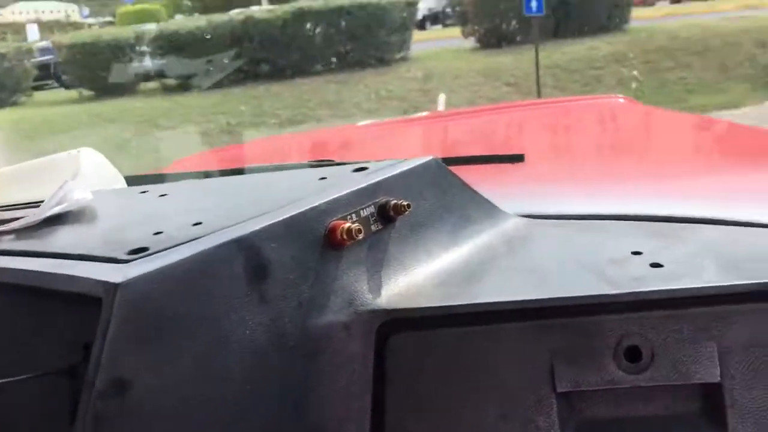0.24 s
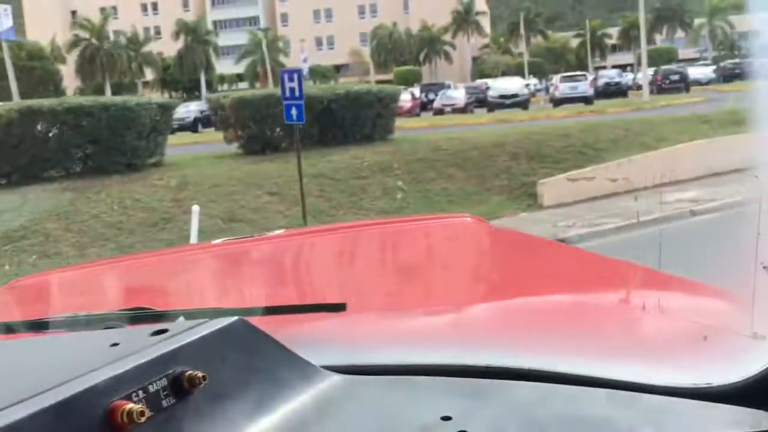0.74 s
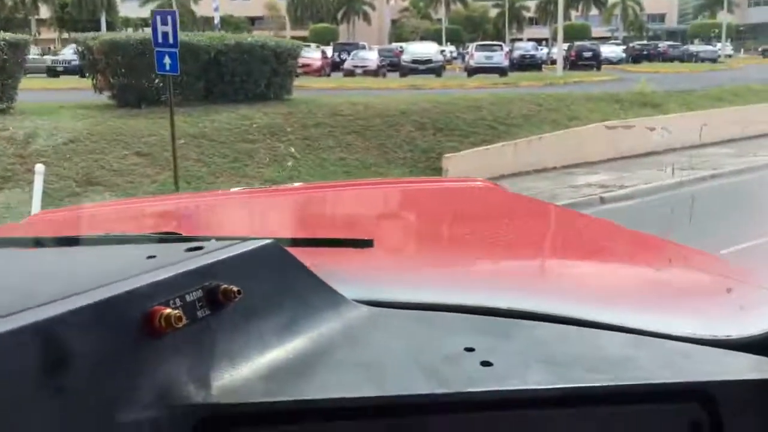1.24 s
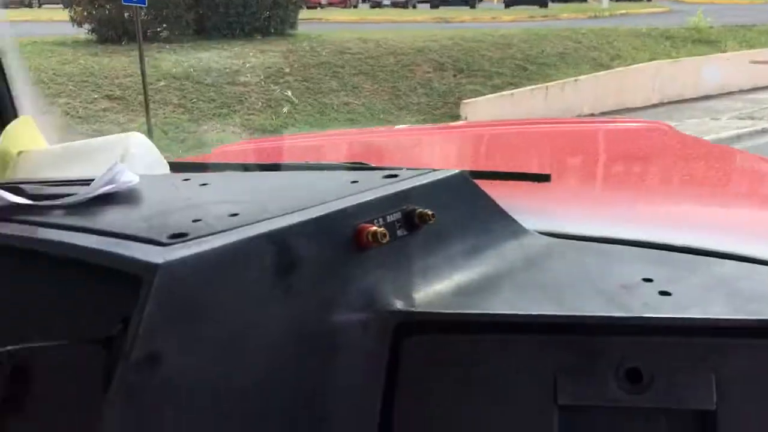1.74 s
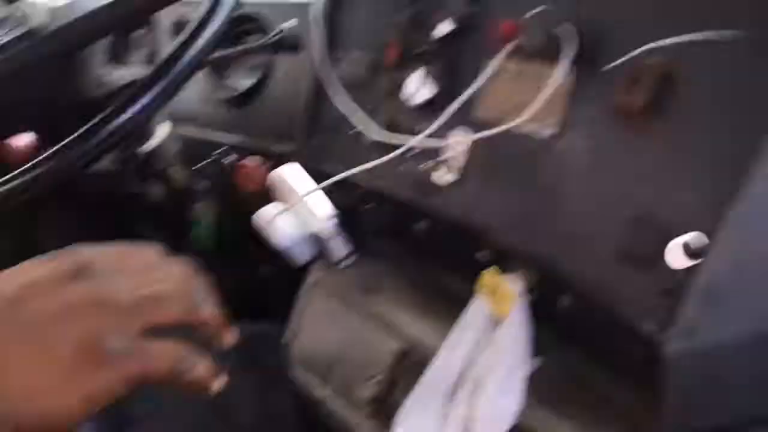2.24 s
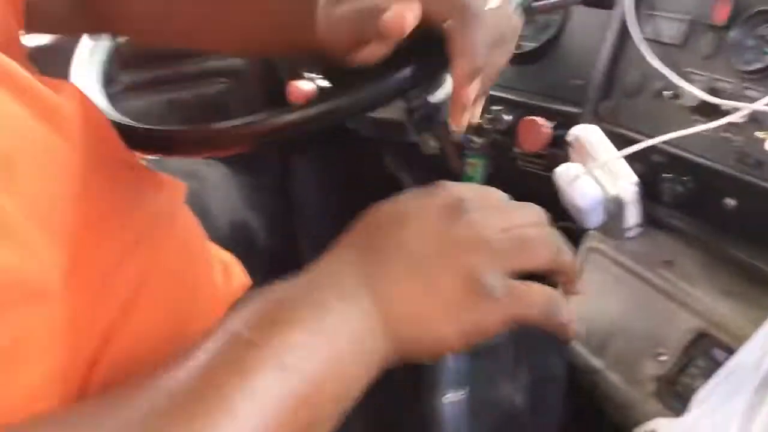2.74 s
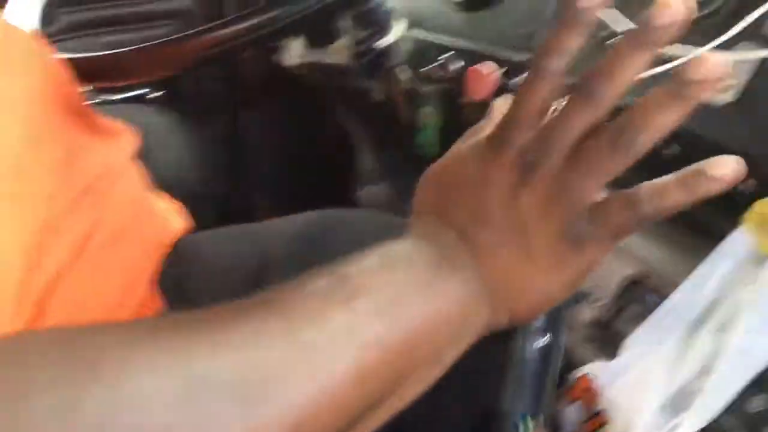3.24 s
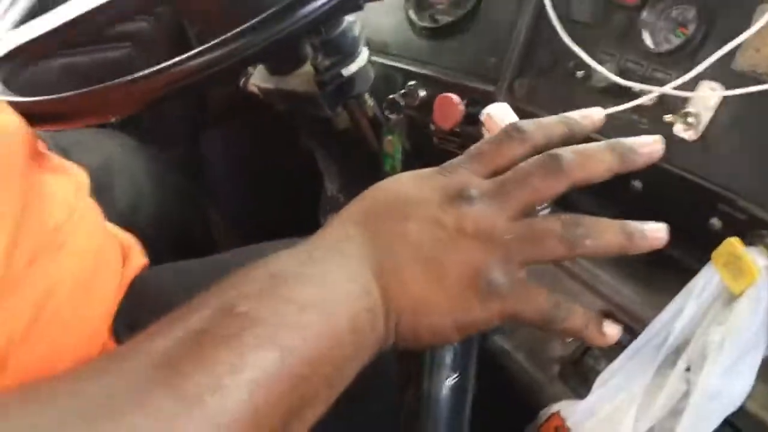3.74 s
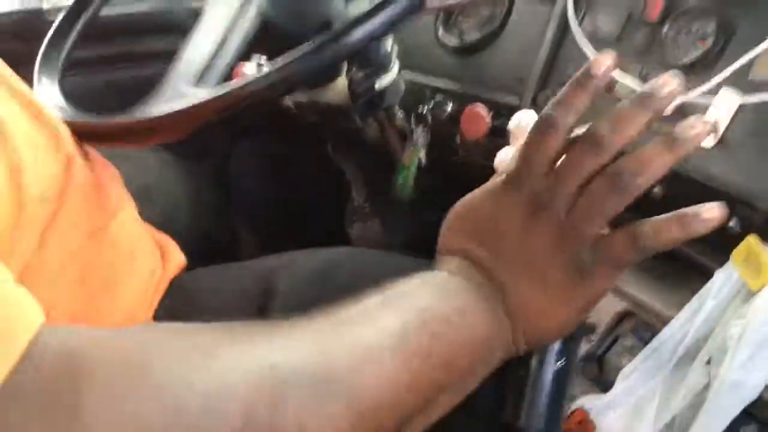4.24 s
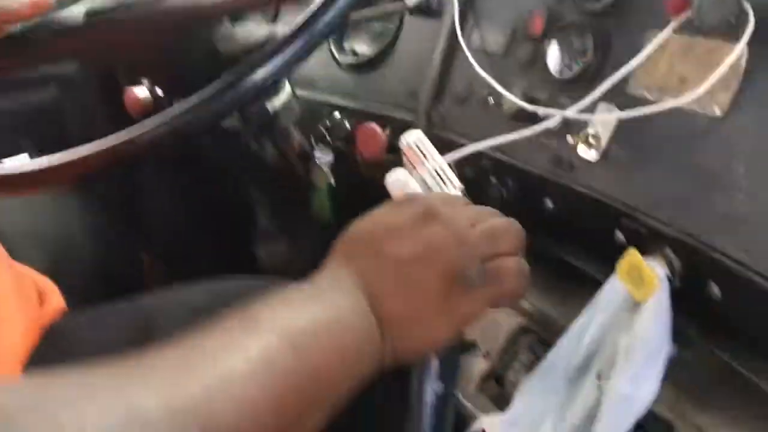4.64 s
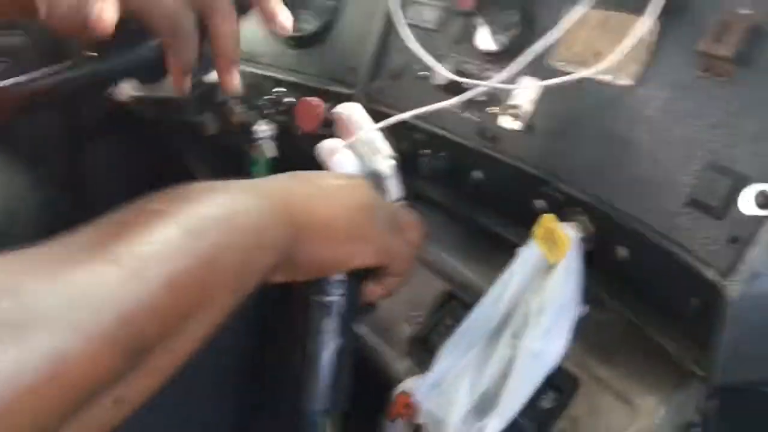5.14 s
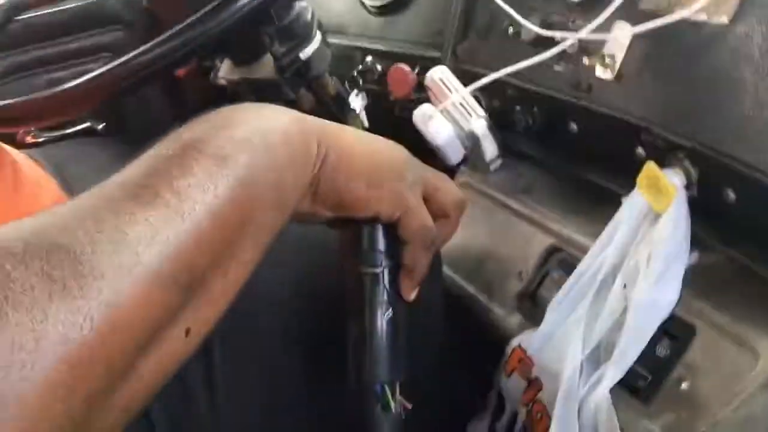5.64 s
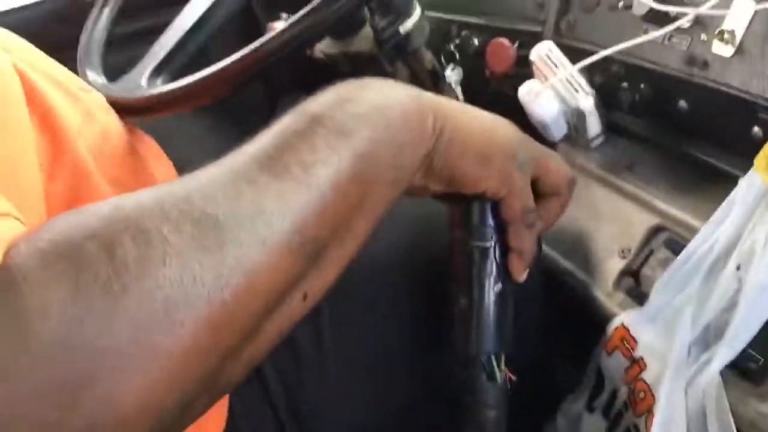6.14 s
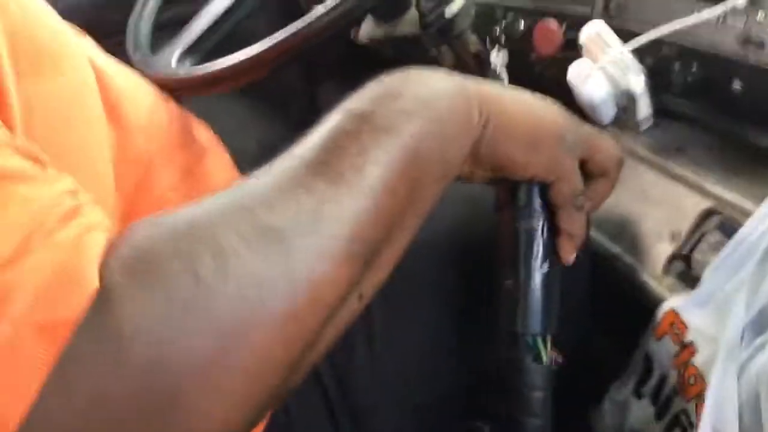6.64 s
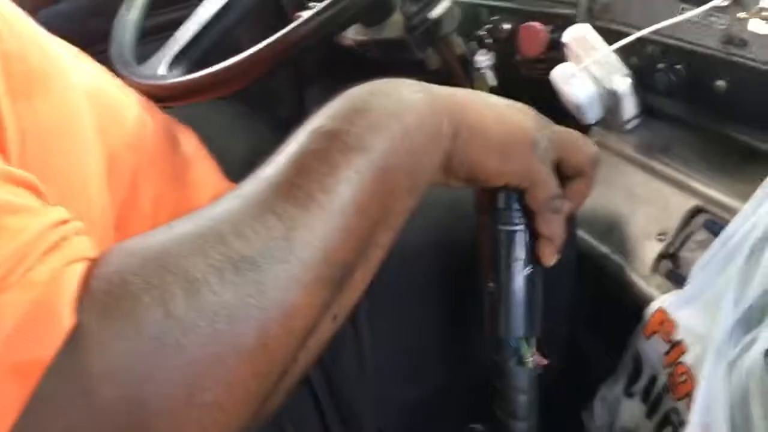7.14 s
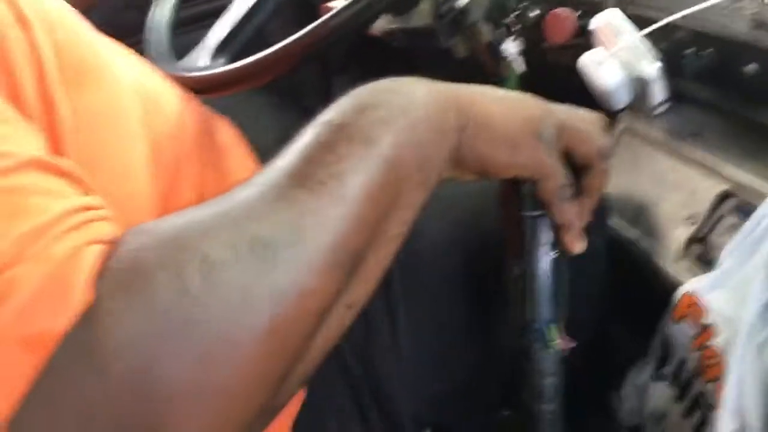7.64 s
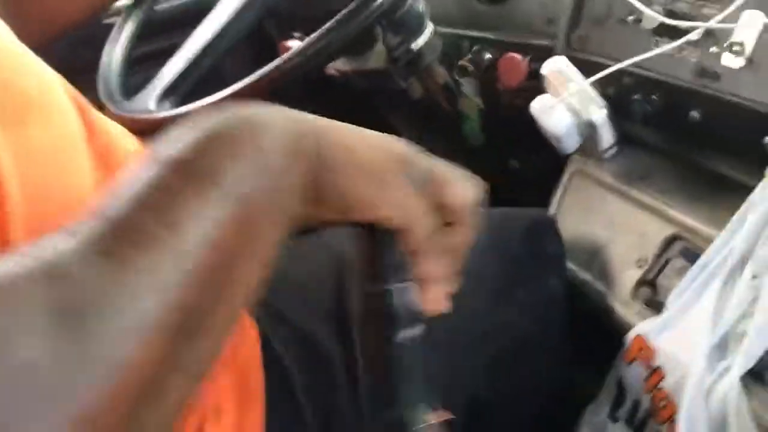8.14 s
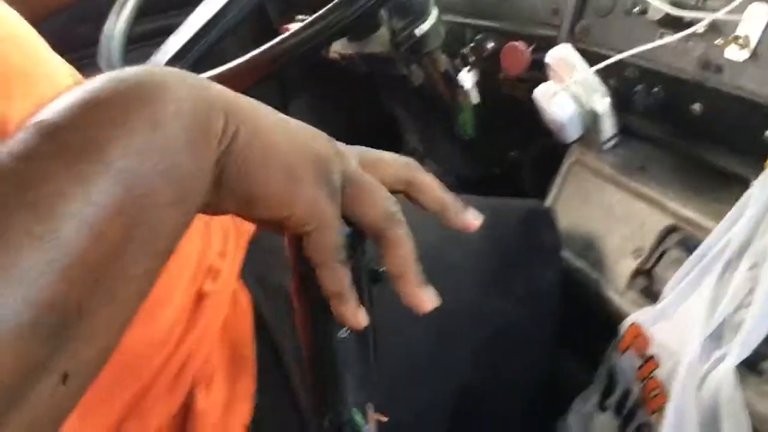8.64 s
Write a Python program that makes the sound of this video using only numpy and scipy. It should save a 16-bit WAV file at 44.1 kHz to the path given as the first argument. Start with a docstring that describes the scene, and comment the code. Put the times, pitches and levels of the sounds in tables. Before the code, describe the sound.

A heavy diesel truck accelerates, heard from the cab: gears grind and clunk home, then the engine climbs again over road rumble.

```python
"""Inside the cab of a six-cylinder diesel truck in town, microphone now nearer the windscreen, now back.
The truck pulls through the gears: firings boom in the cab and ring a pipe resonance, the block clatters,
the turbocharger whistles up and down, loose parts buzz and the road rumbles underneath.
In the first shift the gear teeth grind, then clunk home, and the higher gear whines under load;
the second shift only clicks."""
import sys
import numpy as np
from scipy import signal
from scipy.fft import rfft, irfft
from scipy.io import wavfile
from scipy.ndimage import uniform_filter1d

SR = 44100
rng = np.random.default_rng(int(sys.argv[2]) if len(sys.argv) > 2 else 0)


def persist_wave(psi):
    """Save psi, clipped to +-1, as 16-bit WAV."""
    counts = np.round(np.clip(psi, -1, 1) * 32767).astype(np.int16)
    wavfile.write(sys.argv[1], SR, np.atleast_2d(counts).T)


N = 392931
T = np.arange(N) / SR
CYLINDERS = 6
# Ringing of the gearbox case. Each row: frequency in Hz, width in Hz, level in dB.
GEARBOX_MODES = [(1440, 14, 4), (2320, 46, -2), (2445, 27, 5), (2700, 45, -3), (3310, 33, 8),
                 (3680, 35.3, 2.5), (4327, 50, 1), (6556, 30, -5), (8190, 53, 7)]


def undb(db):
    """Decibels to gain."""
    return 10 ** (np.asarray(db) / 20)


def unit(x):
    """Scale to rms 1."""
    return x / np.sqrt(np.mean(x ** 2))


def noise():
    """White noise."""
    return rng.standard_normal(N)


def walk(rate):
    """Smooth random drift around zero, with about rate changes a second."""
    hold = int(SR / rate)
    steps = np.repeat(rng.standard_normal(N // hold + 1), hold)
    return 0.73 * uniform_filter1d(uniform_filter1d(steps, hold), hold)[:N]


def lookup(x, points):
    """Read a table of (x, value) points, joined by straight lines."""
    return np.interp(x, *np.transpose(points))


def gate(start_s, end_s, rise_s, fall_s):
    """Envelope 0-1: attack from the start, hold, release from the end."""
    attack = 1 - np.exp(-np.maximum(T - start_s, 0) / rise_s)
    return attack * np.exp(-np.maximum(T - end_s, 0) / fall_s)


def colour(x, points):
    """Minimum-phase filter through (Hz, dB) points."""
    hz, db = np.transpose(points)
    size = 8192
    bins_hz = np.maximum(np.fft.rfftfreq(size, 1 / SR), 1)
    cepstrum = irfft(np.log(undb(np.interp(np.log(bins_hz), np.log(hz), db))))
    fold = 1 + np.sign(np.fft.fftfreq(size))
    return signal.fftconvolve(x, irfft(np.exp(rfft(cepstrum * fold))))[:N]


def ring(x, modes):
    """Sum of resonances (Hz, width Hz, dB)."""
    return sum(undb(db) * signal.lfilter(*signal.iirpeak(hz, hz / width, SR), x)
               for hz, width, db in modes)


def band(x, lo_hz, hi_hz):
    """Steep band-pass."""
    sos = signal.butter(3, [lo_hz, min(hi_hz, .48 * SR)], "band", fs=SR, output="sos")
    return signal.sosfilt(sos, x)


def strength(levels, state):
    """Gain from a coasting level in dB, changed by load, boost and nearness to the windscreen."""
    coast_db, *changes_db = levels
    return undb(coast_db + sum(db * share for db, share in zip(changes_db, state)))


def pedal():
    """The accelerator sets the engine load 0-1 and lifts boom and growl (dB) from their coasting levels."""
    # Each row: down and up in seconds, load 0-1, boom in dB, extra boom as the load bites in dB,
    # growl in dB.
    presses = [(-.2, 2.68, .75, 0, 1, 0), (2.9, 2.94, .4, 1, 0, -15), (3.19, 3.58, .6, 1.5, -3, -5),
               (4.185, 7.89, 1, -1.2, 7, 1), (8.44, 9.1, 1, 1, 1, 1.5)]
    coast_boom_db, coast_growl_db, bite_s = -16.5, -27.5, .8
    load, boom_db, growl_db = 0, coast_boom_db, coast_growl_db
    for down, up, effort, press_db, bite_db, pipe_db in presses:
        press = gate(down, up, rise_s=.018, fall_s=.05)
        bite = np.exp(-np.maximum(T - down, 0) / bite_s)
        load += effort * press
        boom_db += press * (press_db + bite_db * bite - coast_boom_db)
        growl_db += press * (pipe_db - coast_growl_db)
    return np.clip(load, 0, 1), boom_db, growl_db


def exhaust_boom(phase, firing_hz, boom_db, overtones_db):
    """Exhaust pressure waves fill the cab: firing rate, two overtones and weak in-between orders."""
    # Unequal cylinders. Each row: multiple of the two-turn cycle, level in dB against the firing tone.
    weak_orders = [(3, -27.5), (4, -23), (5, -57), (7, -20.5), (8, -23.5), (10, -35), (11, -31.5)]
    # An exhaust harmonic as heard in the cab. Each row: frequency in Hz, level in dB.
    cab_response = [(53, -16), (64, -15), (74, -17.5), (85, -14.5), (97, -12.5), (106, -29), (124, -22.5),
                    (135, -24.5), (143, -32.5), (152, -27), (172, -31.5), (190, -37.5), (205, -41),
                    (230, -63), (260, -50), (287, -48.5)]
    angle = 2 * np.pi * phase
    between = 0
    for k, db in weak_orders:
        between += undb(db + 2 * walk(20)) * np.cos(k * angle / CYLINDERS + rng.uniform(0, 2 * np.pi))
    low_tones = undb(lookup(firing_hz, cab_response)) * (np.cos(angle) + between)
    overtones = sum(undb(lookup(k * firing_hz, cab_response) + overtones_db) * np.cos(k * angle)
                    for k in (2, 3))
    return np.sqrt(2) * undb(boom_db) * (low_tones + overtones)


def pipe_growl(phase, firing_hz, growl_db):
    """A surge of gas at every crank turn rings the pipe, so the resonance throbs."""
    # Resonances of the pipe. Each row: frequency in Hz, gain in dB.
    pipe_spectrum = [(150, -44), (245, -30), (288, -10), (315, -20.5), (350, -13.5), (385, -5), (418, 3.5),
                     (438, 1.5), (465, -25), (530, -25.5), (610, -21.5), (665, -10.5), (760, -25),
                     (1100, -47)]
    # It growls once the engine turns fast enough. Each row: firing rate in Hz, level in dB.
    level_by_speed = [(55, -50), (65, -33.5), (75, -23.5), (93, -24), (97, -30)]
    # Unequal cylinders favour some orders: multiples of the two-turn cycle, then their levels in dB.
    orders = (22, 24, 26, 28, 30, 32, 34, 36)
    orders_db = (-2.5, 1, 3, 1.5, -5, 2, -1.5, -1)
    odd_order_db, turbulence = -13, .4
    cycle = 2 * np.pi * phase / CYLINDERS
    surges = 0
    for k in range(16, 72):
        # orders arrive roughly in step; the odd ones make the surges alternate strong and weak
        size = undb(odd_order_db * (k % 2) + np.interp(k, orders, orders_db))
        surges += size * np.cos(k * cycle + np.pi / 2 * rng.uniform(-1, 1))
    flow = unit(surges) * (1 + .08 * walk(60)) + turbulence * noise()
    cab_walls = signal.butter(4, 560, fs=SR, output="sos")  # pass only the low part of each surge
    pipe = signal.sosfilt(cab_walls, colour(flow, pipe_spectrum))
    pipe /= np.sqrt(uniform_filter1d(pipe ** 2, SR // 3))  # even out the level
    return pipe * undb(growl_db + lookup(firing_hz, level_by_speed))


def cab_reflections(x, t60_s, wet_db):
    """Dense early reflections from glass and dashboard."""
    age = T[:SR // 6]
    tail = rng.standard_normal(len(age)) * undb(-60 * age / t60_s) * (age > .002)
    response = undb(wet_db) * tail / np.linalg.norm(tail)
    response[0] = 1
    return signal.fftconvolve(x, response / np.linalg.norm(response))[:N]


def jolts(phase, spread_db, decay_firings):
    """One decaying pulse at each firing, each with another force."""
    firing = np.floor(phase).astype(int)
    force = undb(spread_db * rng.standard_normal(N // 100))[firing]
    return force * np.exp(-(phase % 1) / decay_firings)


def block_clatter(phase, firing_hz, state):
    """Each combustion knocks the block; the noise grows with load and softens as boost builds."""
    # Ringing of the block. Each row: frequency in Hz, width in Hz, level in dB.
    block_modes = [(703, 27, -15), (1033, 50, -4), (1530, 25, -15.5), (1840, 38, -23), (1980, 11, 2),
                   (2480, 32, -9), (2800, 81, -14), (4370, 100, -26), (6180, 90, -9)]
    # Tone of the block and of the airy top. Each row: frequency in Hz, gain in dB.
    block_spectrum = [(280, -42), (480, -1), (545, -3), (647, 0), (853, -0.5), (968, -3.5), (1150, -6.5),
                      (1340, -8.5), (1680, -12), (2220, -11.5), (3090, -17), (4030, -18), (4900, -24),
                      (6030, -21), (7500, -31), (9750, -84), (16500, -120)]
    air_spectrum = [(5500, -7.5), (7000, 5), (9600, 1.5), (10400, -11), (11800, -2), (13500, -15),
                    (15500, -30)]
    # Four bands, low to high. Each gives, in dB: coasting level, then the change at full load,
    # at full boost and with the microphone beside the windscreen.
    roar_db = (-42, 6, -6, -1.5)
    rattle_db = (-45.5, 6.5, -5.5, 7)
    hiss_db = (-47, 5, -6.5, 2)
    air_db = (-52.5, 1, -1.5, 4.5)
    knocks = 1 + 0.4 * jolts(phase, spread_db=2.7, decay_firings=0.24)
    drive = noise() * knocks * undb(1.54 * walk(350))  # valves and fittings tick between the knocks
    drive = cab_reflections(drive, t60_s=0.07, wet_db=-5.5)
    block = colour(drive + ring(drive, block_modes), block_spectrum)
    speed_gain = undb(0.113 * (firing_hz - 74))
    roar = unit(band(block, 506, 990)) * strength(roar_db, state) * speed_gain
    rattle = unit(band(block, 1215, 2760)) * strength(rattle_db, state)
    hiss = unit(band(block, 3370, 6750)) * strength(hiss_db, state)
    air = unit(colour(band(drive, 8600, 24400), air_spectrum)) * strength(air_db, state)
    return roar + rattle + hiss + air


def whistle(hz, width_hz):
    """A tone smeared into a narrow band of noise."""
    smooth = signal.butter(2, width_hz / 2, fs=SR, output="sos")
    angle = 2 * np.pi * np.cumsum(hz) / SR
    return unit(sum(signal.sosfilt(smooth, noise()) * wave(angle) for wave in (np.cos, np.sin)))


def turbocharger(shaft_hz, load):
    """Two blade orders whistle; under load a wider rush of air surrounds them."""
    # Each order swells as it sweeps the intake resonances. Each row: shaft speed in Hz, level in dB.
    fifth_levels = [(1100, -70), (1400, -56), (1700, -52), (1812, -40.5), (1905, -48.5), (1980, -41.5),
                    (2055, -56.5), (2140, -58)]
    seventh_levels = [(1050, -43.5), (1400, -47), (1750, -46.5), (1970, -51.5), (2110, -56)]
    full_flow_load, coast_db = 0.8, -6.5
    fifth_hz, seventh_hz = 5 * shaft_hz, 7 * shaft_hz
    flow = uniform_filter1d(np.minimum(load / full_flow_load, 1), SR // 4)
    rush_share = np.clip(flow * (shaft_hz - 1000) / 600, 0, .95)
    rush = np.sqrt(rush_share) * whistle(seventh_hz, width_hz=1150)
    fifth = whistle(fifth_hz, width_hz=190) + undb(-2.5) * flow * whistle(fifth_hz, width_hz=930)
    seventh = np.sqrt(1 - rush_share) * whistle(seventh_hz, width_hz=450) + rush
    fifth *= undb(lookup(shaft_hz, fifth_levels))
    seventh *= undb(lookup(shaft_hz, seventh_levels))
    return (fifth + seventh) * undb(coast_db * (1 - flow))


def loose_parts(phase, firing_hz, state):
    """Firings jolt dashboard, trim and gear lever against their seats, so they buzz."""
    # Resonances of each part. Each row: frequency in Hz, width in Hz, level in dB.
    dashboard_modes = [(918, 23, 3), (961, 18, 6.5), (1374, 11, 0)]
    trim_modes = [(2174, 38, 11), (2294, 30, 8.5), (2786, 29, 0.5)]
    lever_modes = [(3276, 91, 6), (3540, 120, 2.5), (4270, 300, -6)]
    # Each gives, in dB: coasting level, then the change at full load, at full boost, by the windscreen.
    dashboard_db = (-52.5, 11, -8, 9.5)
    lever_db = (-49.5, 1.5, -9.5, -26)
    # The trim buzzes when the speed suits it. Each row: firing rate in Hz, level at full load in dB.
    trim_by_speed = [(53, -38.5), (60, -52.5), (70, -49.5), (76, -46), (83, -60), (96, -65)]
    # The lever rattles when pushed against a gear. Each row: start and end in seconds, level in dB.
    lever_pushes = [(3.2, 3.48, -35), (3.82, 4.1, -47), (8.26, 8.38, -46)]
    load = state[0]
    pushed = sum(undb(db) * gate(start, end, rise_s=0.013, fall_s=0.053)
                 for start, end, db in lever_pushes)
    parts = ((dashboard_modes, strength(dashboard_db, state)),
             (trim_modes, load * undb(lookup(firing_hz, trim_by_speed))),
             (lever_modes, strength(lever_db, state) + pushed))
    buzz = 0
    for modes, gain in parts:
        taps = jolts(phase, spread_db=2.2, decay_firings=0.39) * noise()
        buzz += gain * unit(band(ring(taps, modes), 0.86 * modes[0][0], 1.6 * modes[-1][0]))
    return buzz


def road_rumble():
    """Tyres and chassis shake the cab."""
    # Tone of the rumble. Each row: frequency in Hz, gain in dB.
    spectrum = [(20, -66.5), (35, -7.5), (52, -1), (110, 0.5), (170, -10), (230, -17.5), (330, -11.5),
                (420, -16), (600, -20.5), (1200, -46.5)]
    # The rumble swells as the clutch bites after each shift. Each row: time in seconds, level in dB.
    levels = [(0, -29), (1.7, -23), (2.6, -32.5), (3.7, -27.5), (4.25, -18.5), (4.7, -25.5), (5.6, -25),
              (7.95, -38), (8.6, -21.5), (8.91, -20.5)]
    sway_db = 1.2 * walk(9)
    return unit(colour(noise(), spectrum)) * undb(lookup(T, levels) + sway_db)


def gear_shifts():
    """Dog teeth skip over each other, scrape and drop into mesh; the case rings."""
    # Hard knocks of teeth and lever. Each row: start in seconds, peak level in dB.
    knocks = [(2.806, -33.5), (3.142, -16.5), (3.1853, -23), (3.208, -22.5), (3.227, -20), (3.2674, -18.5),
              (3.2823, -21.5), (3.4262, -27), (3.4349, -15), (3.4464, -17.5), (4.039, -16), (4.0551, -9.5),
              (4.067, -19), (4.0963, -14.5)]
    # How a knock dies away. Each row: share of the peak, decay time in seconds.
    knock_decays = [(0.37, 0.00076), (0.73, 0.0068), (0.15, 0.018)]
    # Teeth scraping over each other. Each row: start and end in seconds, level in dB.
    scrapes = [(3.141, 3.27, -31.5), (3.27, 3.41, -31.5), (3.409, 3.461, -25), (4.048, 4.077, -20.5),
               (4.087, 4.12, -31.5), (8.293, 8.327, -37.5)]
    # How far the teeth have meshed, so that blows reach the case. Each row: time in seconds, share 0-1.
    meshing = [(3.4, 0), (3.44, 0.46), (4.03, 1)]
    # Tone before and after meshing. Each row: frequency in Hz, gain in dB.
    teeth_spectrum = [(530, -17), (900, -3.5), (1290, -9.5), (1480, -3.5), (2360, -2.5), (2860, -8),
                      (3260, -6), (3630, -1), (4080, -8.5), (4440, -3), (4820, -12.5), (6500, -9.5),
                      (7590, -16.5), (9400, -10), (15500, -26.5)]
    case_spectrum = [(590, -55), (1000, -6), (1320, -7), (1480, -2.5), (1770, -4), (2340, -1), (2740, -5),
                     (2970, -8.5), (3410, -11.5), (3830, -2), (4980, -14), (6480, -9), (7610, -17.5),
                     (9800, -13.5), (15500, -28)]
    skip_hz, skip_depth, skip_decay_s = 48.5, 1.8, .004  # teeth skip at the difference of shaft speeds
    blows = np.zeros(N)
    for start, db in knocks:
        age = np.maximum(T - start, 0)
        decay = sum(share * np.exp(-age / decay_s) for share, decay_s in knock_decays)
        blows += (T >= start) * undb(db) * decay
    since_skip = (T - scrapes[0][0]) % (1 / skip_hz)
    skips = 1 + skip_depth * np.exp(-since_skip / skip_decay_s)
    scrape = sum(undb(db) * gate(start, end, rise_s=0.011, fall_s=0.022) for start, end, db in scrapes)
    scrape *= skips * undb(3.6 * walk(400))
    drive = noise()
    contact = drive * np.hypot(blows, scrape)
    mesh = lookup(T, meshing)

    def metal(x, spectrum):
        return colour(1.06 * x + ring(x, GEARBOX_MODES), spectrum)

    # each path is scaled so that steady noise would come through at rms 1
    return sum(metal(share * contact, spectrum) / np.std(metal(drive, spectrum))
               for share, spectrum in ((1 - mesh, teeth_spectrum), (mesh, case_spectrum)))


def pipe_tone_and_gear_whine(phase, firing_hz, load):
    """In the higher gear the pipe and the loaded teeth sing, louder with speed; the case rings along."""
    # A low pipe tone, then three high gear whines, as multiples of the firing rate.
    orders = (7, 33, 39, 44)
    # One tone a row. Each row: level near top speed in dB, slope in dB per Hz of firing rate.
    levels = [(-40, 1.2), (-55.5, .8), (-61.5, 0), (-55.5, 1)]
    near_top_hz, start_s = 95.54, 4.7
    tones = 0
    for k, (db, slope) in zip(orders, levels):
        gain = undb(db + slope * (firing_hz - near_top_hz) + 2 * walk(20))
        tones += gain * np.sin(2 * np.pi * k * phase + 0.75 * walk(30))
    return np.sqrt(2) * (tones + ring(tones, GEARBOX_MODES)) * load * (T > start_s)


def scene():
    """Engine, gearbox and road meet at one microphone in the cab."""
    # Engine speed. Each row: time in seconds, firing rate in Hz.
    engine_speed = [(0, 52.96), (.3, 54.5), (.7, 62.03), (1.44, 75.65), (1.801, 81.5), (1.959, 86.3),
                    (2.51, 96.7), (2.67, 95.6), (2.779, 87.7), (3.2, 80.2), (3.529, 95.38), (3.85, 84),
                    (4.07, 68.9), (4.22, 67.36), (4.38, 56.5), (4.6, 67.24), (4.79, 64.2), (5.351, 72.75),
                    (5.58, 73.23), (5.83, 78.4), (7, 88.45), (7.59, 94.3), (7.87, 96.8), (7.97, 86.5),
                    (8.28, 78.9), (8.45, 69.2), (8.61, 75.3), (8.81, 69.17), (8.91, 69.7)]
    # Turbocharger speed. Each row: time in seconds, shaft speed in Hz.
    turbo_speed = [(0, 1125), (1, 1670), (1.4, 1805), (1.9, 1973), (2.52, 2110), (2.69, 2010), (2.82, 1720),
                   (3.15, 1460), (3.5, 1426), (3.85, 1188), (4.24, 1037), (5, 1572), (5.6, 1822), (6, 1909),
                   (6.8, 2091), (7.88, 2160), (8, 1847), (8.25, 1490), (8.52, 1298), (8.91, 1586)]
    # How close the microphone is held to the windscreen. Each row: time in seconds, nearness 0-1.
    microphone_path = [(0, 0.5), (.5, 0.17), (1.3, 0.94), (1.95, 0.98), (2.35, 0.26)]
    full_boost_hz = 2105
    firing_hz = uniform_filter1d(lookup(T, engine_speed), SR // 16)  # the flywheel evens out the speed
    phase = np.cumsum(firing_hz) / SR  # counts firings
    load, boom_db, growl_db = pedal()
    shaft_hz = lookup(T, turbo_speed)
    boost = (shaft_hz / full_boost_hz) ** 3.46
    near = lookup(T, microphone_path)
    state = uniform_filter1d(load, SR // 5), boost, near
    lugging_db = 0.61 * np.maximum(boom_db, 0)  # a lugging engine has stronger overtones
    # beside the windscreen one hears more overtones and less growl
    boom = exhaust_boom(phase, firing_hz, boom_db, overtones_db=lugging_db + 2.5 * near)
    growl = pipe_growl(phase, firing_hz, growl_db - 5 * near)
    engine = boom + growl + block_clatter(phase, firing_hz, state) + turbocharger(shaft_hz, load)
    buzz = loose_parts(phase, firing_hz, state)
    tones = pipe_tone_and_gear_whine(phase, firing_hz, load)
    return (engine + buzz + tones + gear_shifts() + road_rumble())[None]


def record(dry):
    """The phone rounds the highest peaks and cuts the top."""
    ceiling, top_hz = .76, 15800
    rounded = dry / (1 + (dry / ceiling) ** 6) ** (1 / 6)
    return signal.sosfilt(signal.ellip(14, .2, 80, top_hz, fs=SR, output="sos"), rounded)


dry = scene()
out = record(dry)
persist_wave(out)
```